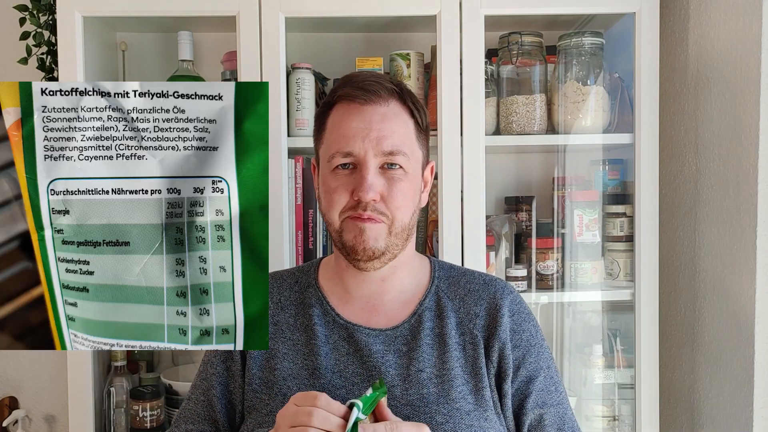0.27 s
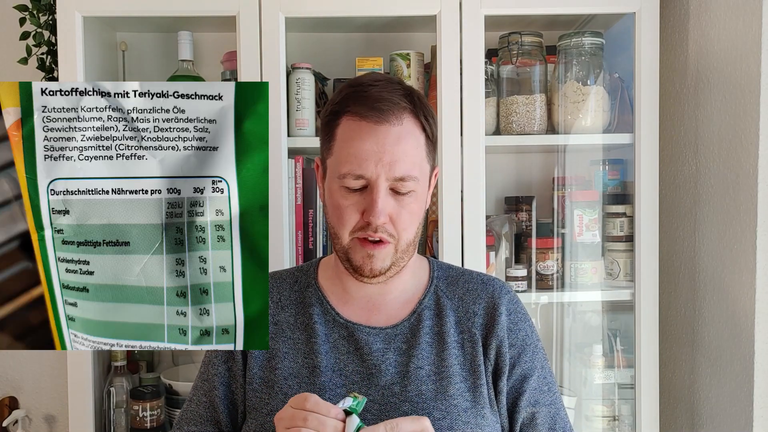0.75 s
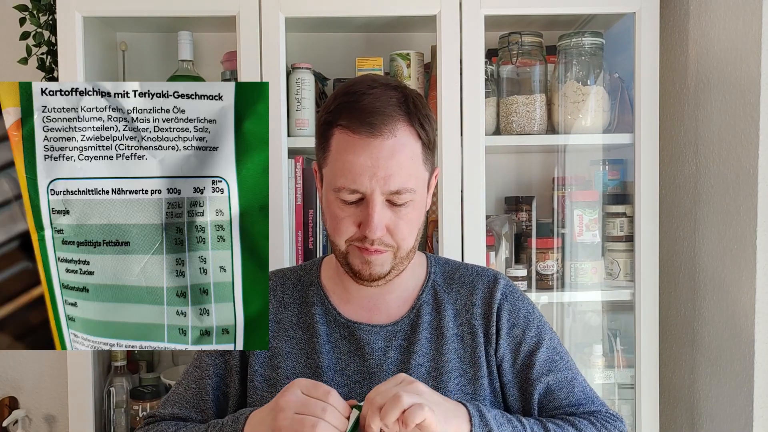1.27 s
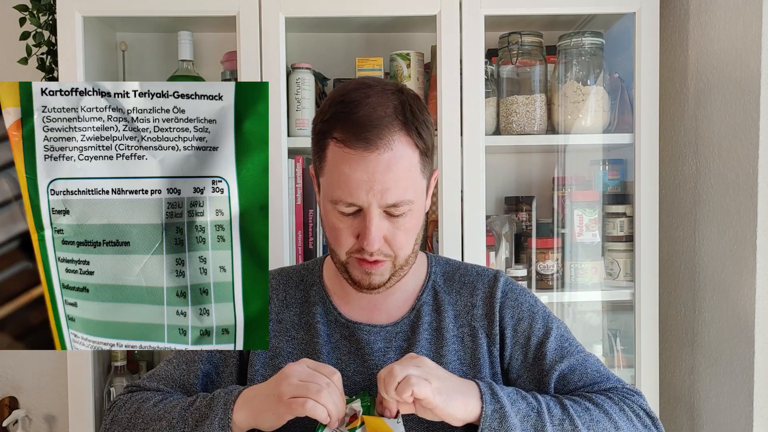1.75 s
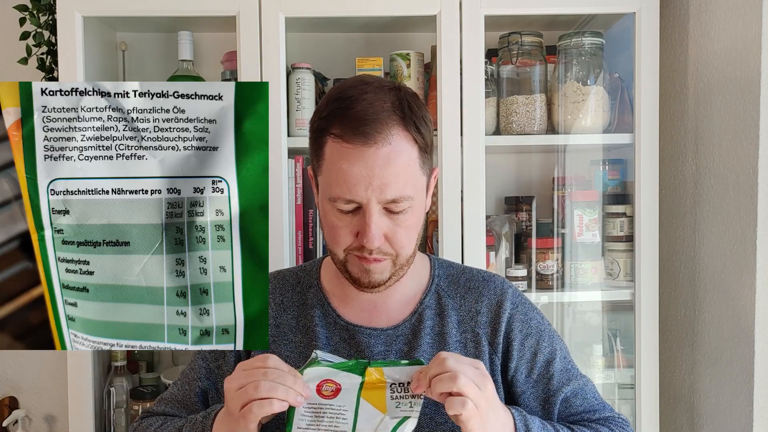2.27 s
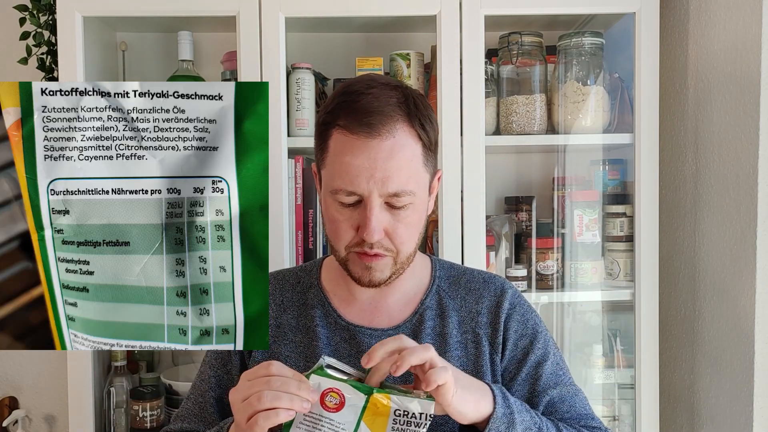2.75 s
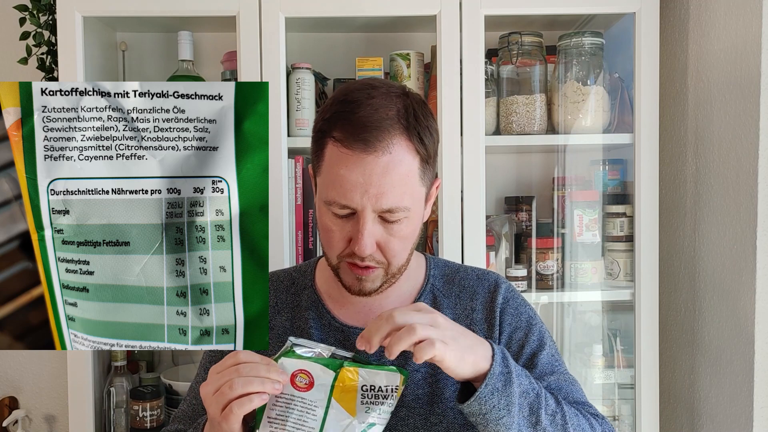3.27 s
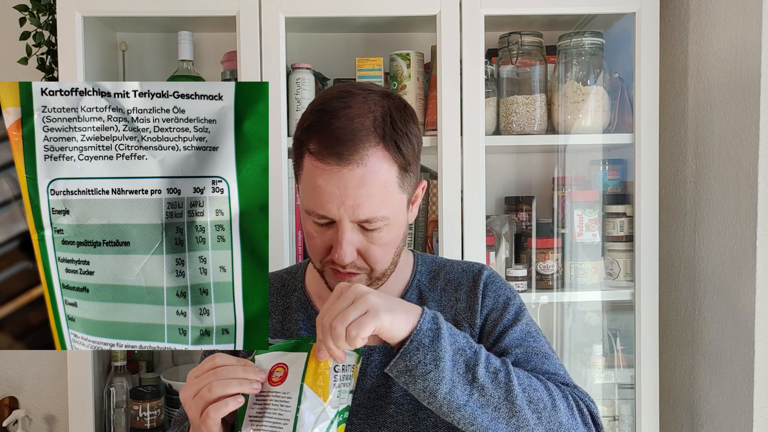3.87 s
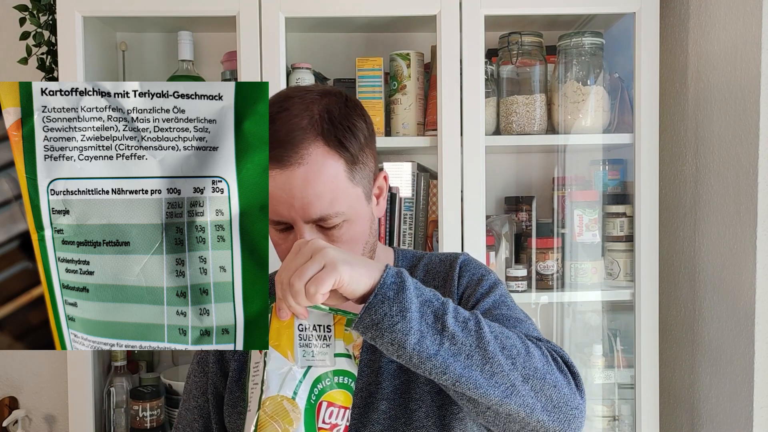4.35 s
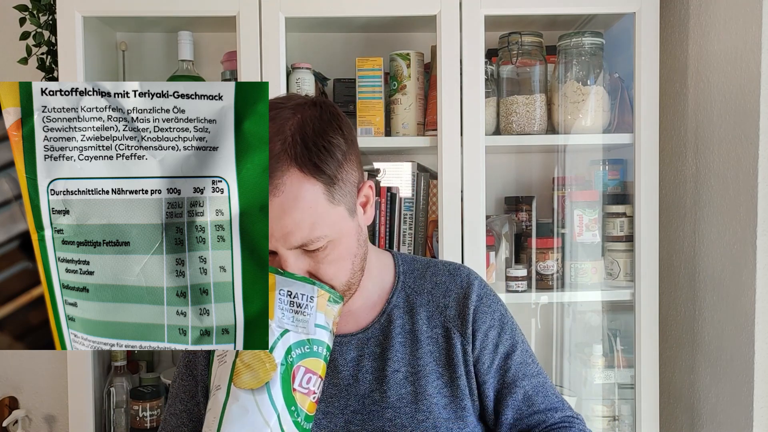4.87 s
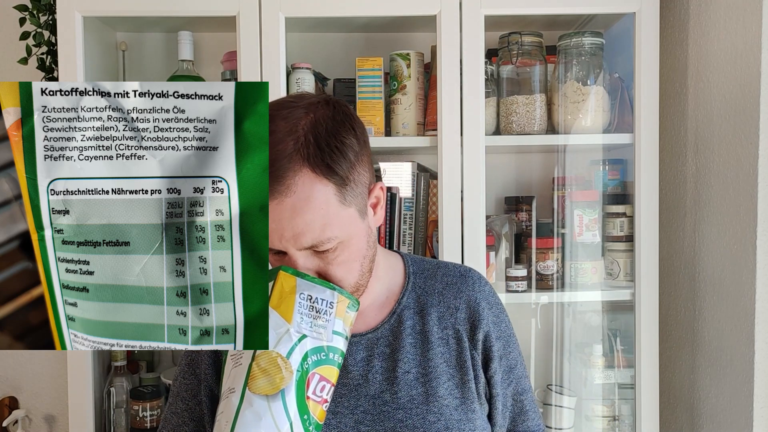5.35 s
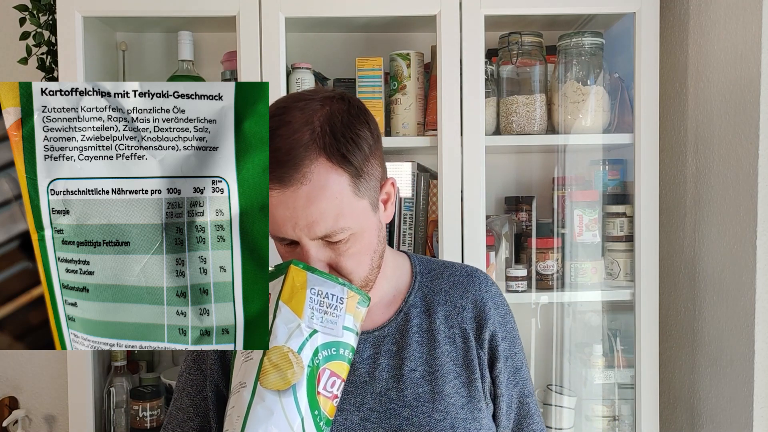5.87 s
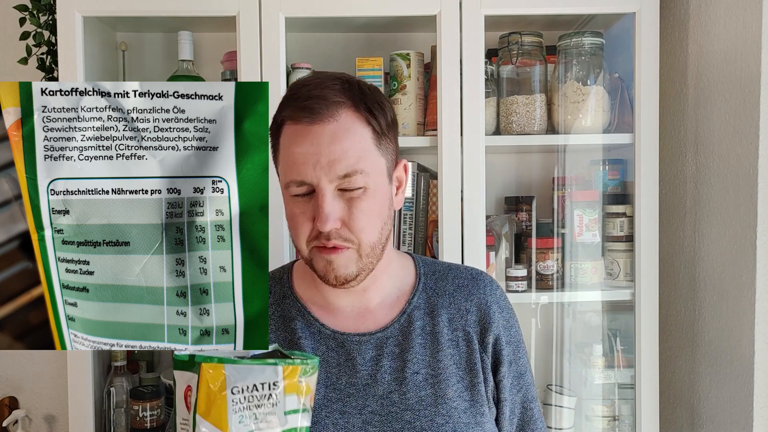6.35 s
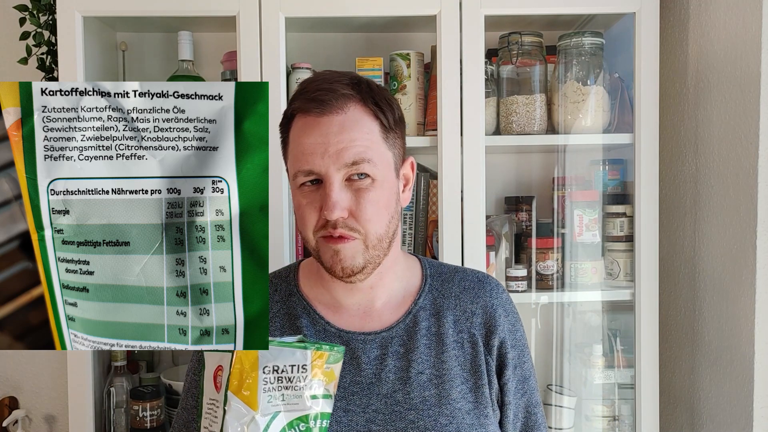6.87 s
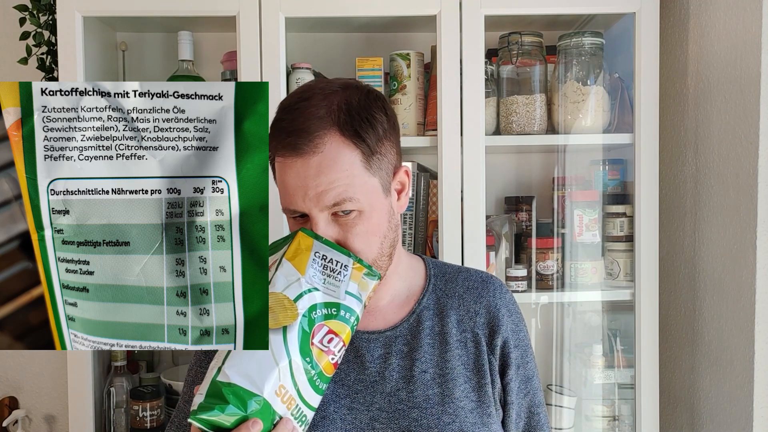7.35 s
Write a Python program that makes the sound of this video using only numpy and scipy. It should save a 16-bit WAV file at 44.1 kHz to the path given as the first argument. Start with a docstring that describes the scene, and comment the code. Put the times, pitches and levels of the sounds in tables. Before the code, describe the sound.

Close, crisp crackling of a chip bag being pulled open by hand, thinning out to soft rustles and ticks.

```python
"""A foil-lined plastic snack bag, pulled open, crumpled, then held at a table in a small furnished room.
Creases in the film buckle as dense crackle, single snaps and dry ticks; the sides pop and the seam
rips rib by rib. Table and walls answer each one. Heard from nearby on a pair of small microphones
with a port resonance, over a low room rumble and their own hiss."""
import sys
import numpy as np
from scipy import signal
from scipy.fft import rfft, irfft, next_fast_len
from scipy.io import wavfile

SR = 44100
rng = np.random.default_rng(int(sys.argv[2]) if len(sys.argv) > 2 else 0)


def store_wav(level_fs):
    """Save 16-bit WAV to argv[1]."""
    pcm = np.round(np.clip(np.atleast_2d(level_fs), -1, 1) * 32767)
    wavfile.write(sys.argv[1], SR, pcm.T.astype(np.int16))


N = 335493
PLACES = 6   # parts of the bag, each with its own paths to the microphones


def from_db(db):
    """Decibels to gain."""
    return 10 ** (np.asarray(db) / 20)


def unit_rms(x):
    """Scale to rms 1."""
    return x / np.sqrt(np.mean(x ** 2) + 1e-20)


def at_hz(points, hz):
    """Read a table on a log-frequency axis."""
    table_hz, values = np.transpose(points)
    return np.interp(np.log(hz + 1), np.log(table_hz), values)


def drift(rate_hz):
    """A slow random wander of rms 1."""
    r = np.exp(-80 * np.pi * rate_hz / SR)
    slow = signal.lfilter([1], [1, -2 * r, r * r], rng.standard_normal(N // 40 + 2002))[2000:]
    return np.interp(np.arange(N) / 40, np.arange(len(slow)), unit_rms(slow))


def ring(clicks, hz, cycles):
    """A click sets a patch of film ringing; it dies by 60 dB in the given cycles."""
    r, w = from_db(-60 * hz / (cycles * SR)), 2 * np.pi * hz / SR
    return signal.lfilter([0, np.sin(w)], [1, -2 * r * np.cos(w), r * r], clicks + 1e-18)


def stereo_noise(size, colour_db, correlation):
    """Noise at two microphones, with a colour and a left-right correlation for each frequency."""
    hz = np.arange(size // 2 + 1) * SR / size
    mid, side = rfft(rng.standard_normal((2, size)))
    alike = np.clip(at_hz(correlation, hz), 0, 1)
    pair = np.sqrt(1 + alike) * mid + np.sqrt(1 - alike) * side * [[1], [-1]]
    return unit_rms(irfft(pair * from_db(at_hz(colour_db, hz)), size))


# Hands squeezing the bag at the table: t/s, rise/s, hold/s, level/dB, slackness/dB
SQUEEZES = [(0.0, 0.04, 0.019, -18.5, 9), (.1, 0.0058, 0.027, -20, -1), (.175, 0.0045, 0.065, -25, 5.5),
            (.27, 0.054, 0.13, -27, -3), (.46, 0.029, 0.045, -20.5, 7), (.58, 0.028, 0.081, -23.5, 8),
            (.78, 0.036, 0.082, -23, 3.5), (.985, 0.025, 0.078, -24, 6), (1.13, 0.017, 0.11, -32.5, 6),
            (1.305, 0.069, 0.08, -23.5, -3.5), (1.38, 0.013, 0.061, -23, -7.5),
            (1.47, 0.023, 0.042, -17.5, -2.5), (1.52, 0.029, 0.03, -16.5, -4), (1.63, .03, 0.18, -30, -32),
            (1.809, 0.035, 0.03, -20, -7), (1.888, 0.024, 0.012, -16, -4), (1.95, 0.027, 0.012, -12, -6),
            (2.008, 0.0084, 0.018, -18.5, 0), (2.08, 0.016, 0.058, -27, -1.5),
            (2.18, 0.055, 0.073, -25.5, 3.5), (2.36, 0.023, 0.021, -42, 7.5),
            (2.48, 0.061, 0.035, -38.5, 5), (2.63, .01, 0.018, -49, 0.5), (2.69, 0.012, 0.18, -51, -2),
            (2.855, 0.017, 0.079, -29, 3.5), (3.01, 0.0071, 0.018, -24.5, 4),
            (3.15, 0.011, 0.018, -33.5, 6.5), (3.295, .01, 0.034, -47.5, 1),
            (3.37, 0.0078, 0.053, -46.5, 8.5), (3.49, 0.0078, 0.016, -53, 8.5),
            (3.575, 0.013, .02, -45, -4), (3.6, 0.012, 0.093, -34, 9), (3.76, 0.026, 0.1, -29, 2.5),
            (3.935, 0.0031, 0.061, -24, 5), (4.1, 0.012, 0.028, -45.5, 12), (4.18, .03, 0.033, -50.5, -1),
            (4.285, 0.011, 0.019, -47, 8), (4.39, 0.0092, .03, -45.5, 6.5),
            (4.465, 0.013, 0.088, -36.5, 6.5), (4.575, 0.0089, 0.0086, -35, 5.5),
            (4.72, 0.025, .03, -51, 8.5), (4.785, 0.009, 0.041, -53.5, 11.5),
            (4.88, 0.018, 0.0082, -61.5, 18.5), (4.94, 0.0085, 0.028, -50, 3.5),
            (5.02, 0.0083, .07, -52.5, -4), (5.135, 0.0043, 0.034, -50, 7.5), (5.22, 0.045, .1, -57.5, -1),
            (5.33, 0.041, 0.011, -51.5, 6.5), (6.191, 0.005, 0.057, -53, 6.5), (6.285, .01, 0.087, -54, 5),
            (6.9, 0.012, 0.21, -74.5, 11), (7.2, 0.011, 0.03, -48, 8.5), (7.24, 0.0046, 0.025, -45, 5.5),
            (7.29, 0.015, 0.15, -57.5, 7), (7.43, 0.026, 0.12, -62, 0)]

def handling(rise_from_db=-1.5, let_go_db_per_s=301.5):
    """Each squeeze rises, holds and is let go; the strongest at a moment sets level and slackness."""
    t = np.arange(0, N, 32) / SR
    start, rise, hold, db, slack = np.transpose(SQUEEZES)[:, :, None]
    rising = rise_from_db * np.clip(1 - (t - start) / np.maximum(rise, .001), 0, 1)
    letting_go = let_go_db_per_s * np.maximum(t - start - rise - hold, 0)
    levels = np.where(t >= start, db + rising - letting_go, -200)
    level_db = np.maximum(levels.max(axis=0), -120)
    slack_db = slack[levels.argmax(axis=0), 0]
    return [np.interp(np.arange(N) / SR, t, curve) for curve in (level_db, slack_db)]


# Fine crackle against the creases, more while the film is pulled taut: t/s, level/dB
FINE_CRACKLE = [(0.0, -1.5), (.7, 0.5), (1.0, 2), (1.3, -2.5), (1.7, 3.5), (1.9, -6.5), (2.3, 0.5),
                (2.7, -15), (3.3, 0.5), (3.8, -8), (4.3, -12), (5.0, -7), (5.4, -28), (6.3, -7), (7.6, -5)]

def crackle(base_per_s, busier, spread_db, clump_db, cycles):
    """Random buckles, clumped in time and uneven in size; large patches ring low, small ones high."""
    crease_db, slack_db = handling()
    bulge_db = slack_db - 2   # the whole bag bulges
    panel_db = .73 * slack_db + 2   # its panels rustle
    fine_db = np.interp(np.arange(N) / SR, *np.transpose(FINE_CRACKLE)) - .052 * slack_db
    per_s = base_per_s * from_db(busier * (crease_db + 14))   # harder handling, more buckles
    buckles = rng.random(N) < per_s * from_db(clump_db * drift(25)) / SR
    sizes = from_db(spread_db * np.minimum(rng.exponential(1, N), 3.2)) * rng.choice([-1, 1], N)
    clicks = unit_rms(buckles * sizes / np.sqrt(per_s))
    out = np.zeros((PLACES, N))
    for low_hz, high_hz, band_db in [(130, 2400, bulge_db), (670, 1795, panel_db),
                                     (2650, 9000, 0), (6605, 13000, fine_db)]:
        patch = rng.integers(0, 2 * PLACES, N)
        pitches = rng.permutation(np.geomspace(low_hz, high_hz, 2 * PLACES))
        rings = [ring(clicks * (patch == k), hz, cycles) for k, hz in enumerate(pitches)]
        by_place = np.add(rings[:PLACES], rings[PLACES:])
        out += unit_rms(by_place) * from_db(crease_db + band_db) / np.sqrt(PLACES)
    return out


# House and street rumbling in the room: t/s, level/dB
RUMBLE_SWELL = [(0.0, -51), (0.21, -40), (0.32, -51), (1.48, -51), (1.82, -57), (1.97, -46.5), (2.84, -60),
                (2.92, -45), (3.51, -57), (4.02, -48), (4.19, -58.5), (5.76, -59.5), (5.99, -51.5),
                (6.69, -61.5), (7.241, -57), (7.6, -59.5)]
# Spectrum of that rumble: f/Hz, relative level/dB
RUMBLE_COLOUR = [(15, 1.5), (28, -1.5), (42, -4.5), (75, -10), (110, -18.5), (300, -57)]

def rumble():
    """House and street swell and sink, a little louder at the right microphone."""
    level_db = np.interp(np.arange(N) / SR, *np.transpose(RUMBLE_SWELL))
    noise = stereo_noise(next_fast_len(N), RUMBLE_COLOUR, correlation=[(20, .8), (200, .8)])
    return from_db(level_db + [[-2], [2]]) * noise[:, :N]


# Self-noise of the microphones: f/Hz, relative level/dB
HISS_COLOUR = [(60, -22), (140, -17), (300, -17), (600, -26), (2000, -30), (4000, -33), (5000, -30),
               (6500, -37), (12000, -35), (16200, -35)]

def hiss(level_db):
    """The microphones hiss steadily, each nearly independent of the other."""
    correlation = [(200, .097), (800, .24), (4000, .05)]
    return from_db(level_db) * stereo_noise(next_fast_len(N), HISS_COLOUR, correlation)[:, :N]


# A whole side of the bag popping in or out: t/s, relative level/dB, f/Hz
SIDE_POPS = [(0.027, -13, 367), (0.177, -15, 313), (0.374, -23, 322), (0.514, -15, 427),
             (1.033, -18.5, 296), (1.212, -26.5, 395), (1.537, -28, 224), (1.987, -33, 308),
             (2.518, -30, 443), (4.395, -36, 409), (4.576, -31, 227.3), (4.829, -45, 305)]

def pops(cycles, push_s, gain_db):
    """A soft push sets the hollow bag ringing low for a few cycles."""
    out, t = np.zeros(N), np.arange(2048) / SR
    push = t * np.exp(-t / push_s)
    for start, db, hz in SIDE_POPS:
        sound = ring(push, hz, cycles)
        i = round(start * SR)
        out[i:i + len(t)] += from_db(db + gain_db) * sound / np.abs(sound).max()
    return out


# Big creases snapping: t/s, relative level/dB, patch f/Hz, neighbours' level/dB, edge level/dB
CREASE_SNAPS = [(0.028, 0.5, 4300, -4, -32), (0.056, -2, 4930, -2, -5), (0.104, 1.5, 2950, 7.5, -3),
                (0.181, 2.5, 2920, 7, -11), (0.316, -10, 4530, -7, -11.5), (0.376, -6.5, 4900, 5, -14),
                (0.518, -5, 2640, 2, -14), (0.524, -3.5, 4770, 2, -4), (0.589, -6, 2940, 1, -7),
                (0.656, -8, 790, -4, -24), (0.696, -3.5, 610, -4, -24), (0.76, -9, 5300, -2, -10),
                (0.793, -5.5, 5650, -2, -12), (0.815, -8.5, 5600, -19, -28), (0.855, -18, 4900, -6, -20),
                (0.956, -8, 1690, 7, 2), (1.0, 0.5, 890, -5, -19), (1.033, -1, 850, -8.5, -18),
                (1.308, -18, 4950, -5, 12), (1.39, -7.5, 880, -42, -14), (1.526, -8, 4950, -18, -18),
                (2.635, -27, 2830, 6, -3), (2.663, -22.5, 4640, 23, -13), (2.759, -26, 3450, 5, -29),
                (2.785, -20.5, 1450, 6.5, -2), (2.856, -16, 2780, -17, -11.5),
                (2.886, -18.5, 4720, -19, -17), (2.922, -13.5, 4530, -3, -18), (3.017, -24, 1600, -3, -21),
                (3.029, -25, 1290, -19, -26), (3.15, -20, 1660, -19, -28), (3.164, -18, 1290, 2, -30),
                (3.296, -22.5, 1700, 13, -28), (3.308, -20.5, 3640, -3, -11), (3.373, -26, 2860, -8, -14),
                (3.518, -33, 1670, -15, -28), (3.574, -34, 2900, 2, -8), (3.61, -21.5, 4760, -28, -38),
                (3.631, -25, 744, -11, -19), (3.76, -17, 740, -10, -28), (3.833, -23, 1570, -8, -12),
                (3.851, -6.5, 1570, 6, -5), (3.938, -5.5, 1320, 4, -28), (3.989, -22, 3030, 8, -26),
                (4.108, -28, 2320, -19, -18), (4.129, -19, 670, -3, -18), (4.219, -31, 2450, 16, -18),
                (4.286, -27.5, 4960, 13, -16), (4.305, -23.5, 4570, 5, -11), (4.396, -26, 3060, 3, -32),
                (4.592, -28, 4900, 5, -5), (4.789, -30, 1550, -12, -21), (4.799, -35, 1550, -9, -25),
                (4.941, -29.5, 740, 26, -16), (5.023, -34, 1010, -24, -9), (5.07, -33, 4770, 5, -4),
                (5.137, -22, 1110, -6, -28), (5.366, -38, 2150, -15, -34), (6.192, -31.5, 5000, -5, -9.5),
                (6.226, -42, 430, -5, -23), (6.288, -30, 4490, 15, -20), (6.298, -30, 4850, 5, -29),
                (6.907, -51, 2580, -7, -14), (7.231, -26.5, 900, -13, -30), (7.246, -27.5, 1110, -8, -17.5),
                (7.353, -28.5, 710, -19, -31)]

def snaps(cycles, gain_db, run_s=.0035, run_density=.074, run_strength=1.63, scatter=.4):
    """A sharp-edged buckle rings its patch and its neighbours and sets off a quickly fading run of further
    buckles, the first of them stronger than it."""
    size = 2048
    out = np.zeros((PLACES, N + size))
    draws = rng.random((len(CREASE_SNAPS), 3, size))
    fade = np.exp(-np.arange(size) / (run_s * SR))
    edge_band = signal.butter(1, [6000, 13000], "band", fs=SR, output="sos")
    for k, (start, db, hz, near_db, edge_db) in enumerate(CREASE_SNAPS):
        chance, sign, detune = draws[k]
        run = (chance < run_density) * (2 * sign - 1) * fade * run_strength
        run[0] = 1   # the first buckle itself
        near_hz = np.array([600, 1200, 2200, 3700, 5200]) * (1 + scatter * (detune[:5] - .5))
        neighbours = from_db(near_db) * sum(ring(run, f, cycles / 2) for f in near_hz)
        edge = from_db(edge_db + 22.5) * signal.sosfilt(edge_band, run)
        sound = ring(run, hz, cycles) + neighbours + edge
        i = round(start * SR)
        out[k % PLACES, i:i + size] += from_db(db + gain_db) * sound / np.abs(sound).max()
    return out[:, :N]


# Lone ticks, close and dry at the microphones: t/s, relative level/dB, f/Hz, ring/cycles
CREASE_TICKS = [(0.647, -6.5, 3400, 2.3), (0.836, -2.5, 5070, 1.25), (0.9, -16, 4900, 3.6),
                (1.031, -3.5, 3450, 0.62), (1.095, -4, 4540, 0.84), (1.166, -11.5, 4500, 1.5),
                (1.399, -20, 900, 4.5), (1.521, -4, 4850, 2.5), (1.598, -14, 4800, 2.8),
                (1.665, -17, 4700, 7), (1.732, -8.5, 4700, 1.9), (1.75, -15, 4600, 1.9),
                (2.088, -8, 4900, 2.6), (2.109, -8, 4800, 1), (2.136, -15, 4800, 1.1),
                (3.583, -33, 9000, 2.2), (3.669, -10.5, 5760, 1.6), (3.776, -10, 6000, 1.1),
                (3.788, -5.5, 4970, 0.64), (4.008, -12.5, 5050, 3.0), (4.732, -35.5, 1164, 5.45),
                (6.749, -47, 5040, 8.5), (6.975, -50.5, 1300, 5), (7.061, -56, 2505, 3),
                (7.09, -49, 2000, 4.7), (7.182, -52.5, 1800, 3), (7.213, -25.5, 830, 4.9),
                (7.243, -25, 4000, 1.1)]

def ticks(gain_db, edge_db):
    """One crease flips over: a single sharp click, rung twice through its own patch."""
    out, click = np.zeros(N + 1024), signal.unit_impulse(1024)
    edge = from_db(edge_db) * np.diff(click, prepend=0)
    for start, db, hz, cycles in CREASE_TICKS:
        ring_cycles = max(cycles, 1)
        patch = ring(ring(click, hz, ring_cycles), hz, ring_cycles)
        sound = patch / np.abs(patch).max() + edge / cycles
        i = round(start * SR)
        out[i:i + len(click)] += from_db(db + gain_db) * sound
    return out[:N]


def hush_before_snaps(hush_db, hush_s):
    """The crackle dips just before each snap or tick, so each starts crisply."""
    due = np.zeros(N)
    due[[round(row[0] * SR) for row in CREASE_SNAPS + CREASE_TICKS]] = 1
    r = np.exp(-1 / (hush_s * SR))
    ahead = signal.lfilter([1], [1, -r], due[::-1])[::-1]
    return from_db(hush_db * np.minimum(ahead, 1))


# Resonances of the taut film at the seam: f/Hz, ring/cycles, relative level/dB
SEAM_MODES = [(2890, 2.0, -4), (4860, 3.0, -4), (7500, 1.6, -9)]

def seam_rip(start_s, ribs, base_gap_s=.0048, extra_gap_s=.016, jitter_s=.0005):
    """The glued seam lets go rib by rib, gathering speed; each slip is one click on the taut film."""
    clicks, rib = np.zeros(N), np.arange(ribs)
    jitter, uneven = rng.standard_normal((ribs, 2)).T
    gaps = base_gap_s + extra_gap_s / (rib + 1)
    slip_s = start_s + np.cumsum(gaps) - gaps + jitter_s * jitter * (rib > 0)
    slip_db = 3 + .1 * rib + 1.2 * uneven
    clicks[(slip_s * SR).astype(int)] = from_db(slip_db)
    return sum(from_db(db) * ring(clicks, hz, cycles) for hz, cycles, db in SEAM_MODES)


def ping(start_s, drive_db, hz, cycles, t60_s):
    """A faint ping near one pitch fades quickly after a tick."""
    since = np.arange(N) / SR - start_s
    fade = (since > 0) * from_db(drive_db - 60 * np.maximum(since, 0) / t60_s)
    fading_noise = rng.standard_normal(N) * fade
    return ring(ring(fading_noise, hz, cycles), hz, cycles) / cycles


# Decay of the small furnished room: f/Hz, T60/s
ROOM_T60 = [(200, 0.42), (1000, .35), (5000, 0.39), (12000, 0.22)]
# Likeness of the echoes at the two microphones: f/Hz, correlation/0-1
ECHO_CORRELATION = [(100, 0.6), (350, 0.9), (700, 0.6), (1400, 0.06), (5000, 0.1), (10000, 0.21)]

def room_response(size, early_db=-1.5, early_s=.0069, tail_db=-2, build_s=.0061):
    """One click at the microphones: direct sound, echoes off table and cupboard, a dying tail."""
    t, flat = np.arange(size) / SR, [(10, 0), (20000, 0)]
    noise, tail = stereo_noise(size, flat, ECHO_CORRELATION), 0
    for low_hz in 80 * 2. ** np.arange(8):
        octave = signal.butter(1, [low_hz, low_hz * 2], "band", fs=SR, output="sos")
        t60_s = at_hz(ROOM_T60, low_hz * 2 ** .5)
        tail = tail + signal.sosfilt(octave, noise) * from_db(-60 * t / t60_s)
    tail *= 1 - np.exp(-(t / build_s) ** 2)
    early = stereo_noise(size, flat, ECHO_CORRELATION) * np.exp(-t / early_s) * (t > .0012)
    response = (from_db(early_db) * unit_rms(early) + from_db(tail_db) * unit_rms(tail)) / np.sqrt(size)
    lag_s, pan_db = rng.standard_normal(2) * [.00009, -1.5]   # between the microphones
    for side, half in enumerate([.5, -.5]):
        direct = np.sinc(np.arange(32) - 8 - half * lag_s * SR)
        response[side, :32] += from_db(half * pan_db) * direct
    return response


def room(places, response_size=24000):
    """Every part of the bag reaches the microphones by its own paths."""
    size = next_fast_len(N + response_size)
    heard = sum(rfft(x, size) * rfft(room_response(response_size), size) for x in places)
    return irfft(heard, size)[:, :N]


# Cavity behind each microphone port, left then right: f/Hz, width/Hz, share/0-1
PORT_CAVITIES = [(5120, 1300, 0.44), (4950, 570, 0.65)]
# Colour of the foil-lined film, thin in the bass: f/Hz, level/dB
FILM_COLOUR = [(55, -41.5), (95, -35.5), (140, -31.5), (250, -19.5), (420, -15.5), (850, -14), (2900, -3.5),
               (4150, -10.5), (5300, -7.5), (6200, -3), (8000, 10), (11000, -0.5), (14000, 1),
               (16200, -7.5)]
# Balance across the microphone pair: f/Hz, left minus right level/dB
BALANCE = [(100, -2), (1000, -3), (3000, -2.5), (4200, -3), (6500, 9), (9000, -16), (14000, -3.5)]

def microphones(x):
    """Each port's cavity lifts its own pitch and shades what lies above; colour and balance follow."""
    size = next_fast_len(N + 4096)
    hz = np.arange(size // 2 + 1) * SR / size
    port_hz, width_hz, share = np.transpose(PORT_CAVITIES)[:, :, None]
    cavity = 1 / (1 - (hz / port_hz) ** 2 + 1j * hz * width_hz / port_hz ** 2)
    colour = from_db(at_hz(FILM_COLOUR, hz) + np.array([[.5], [-.5]]) * at_hz(BALANCE, hz))
    return irfft(rfft(x, size) * (1 - share + share * cavity) * colour, size)[:, :N]


def scene():
    """The bag at the table, heard from nearby over rumble and hiss."""
    bag = crackle(base_per_s=1700, busier=.22, spread_db=3, clump_db=3, cycles=4.64)
    bag *= hush_before_snaps(hush_db=-6.5, hush_s=.014)
    bag[1] += pops(cycles=8, push_s=.001, gain_db=21.5)
    bag += snaps(cycles=6.5, gain_db=7.5)
    flips = ticks(gain_db=6.5, edge_db=-6.5)
    rip = seam_rip(start_s=1.7828, ribs=19)
    bag[2] += from_db(-5.5) * flips   # ticks and rip arrive mostly direct; a share goes round the room
    bag[0] += from_db(-7.5) * rip
    bag[2] += ping(start_s=6.748, drive_db=-61, hz=5050, cycles=14, t60_s=.22)
    return microphones(room(bag) + flips + rip) + rumble() + hiss(level_db=-60)


def record(dry):
    """The recorder clips the loudest peaks and cuts the top treble."""
    lowpass = signal.ellip(14, .5, 90, 16290, fs=SR, output="sos")
    return signal.sosfilt(lowpass, np.clip(dry, -.8, .8))


dry = scene()
out = record(dry)
store_wav(out)
```